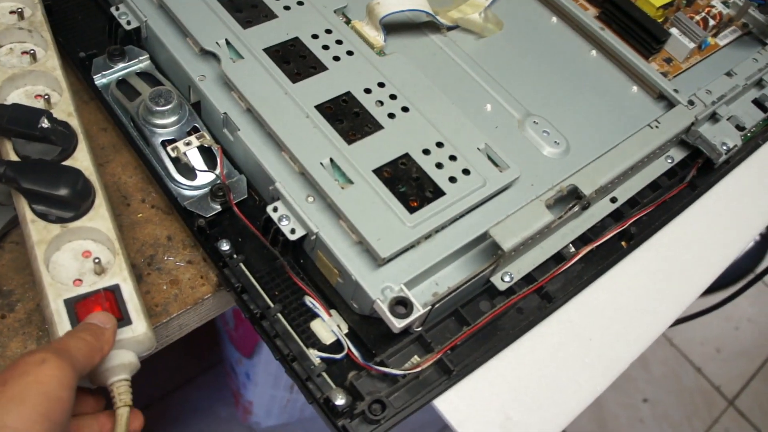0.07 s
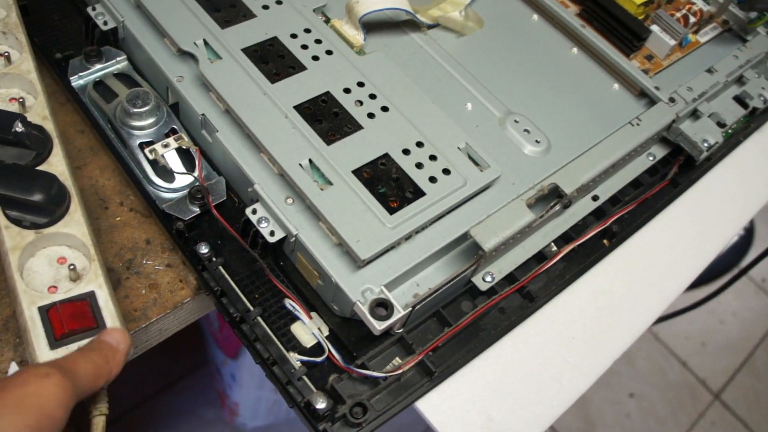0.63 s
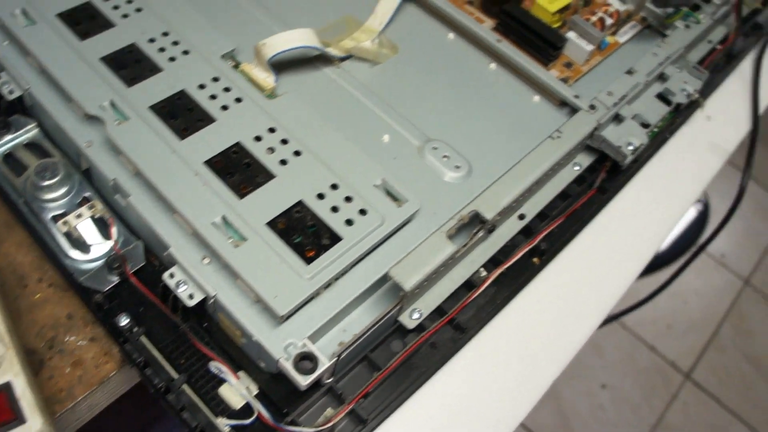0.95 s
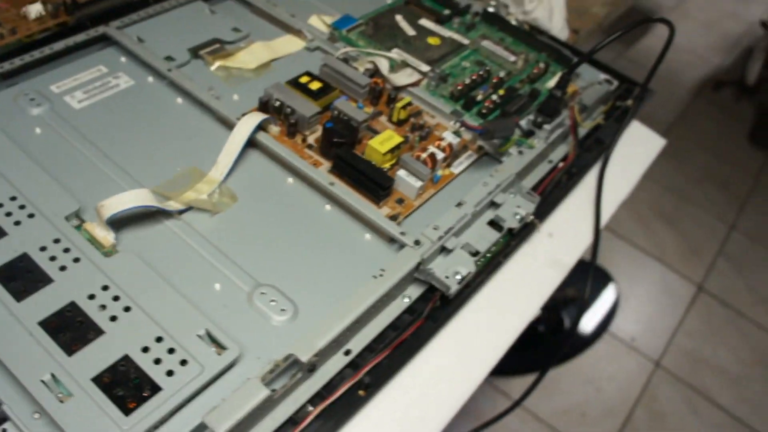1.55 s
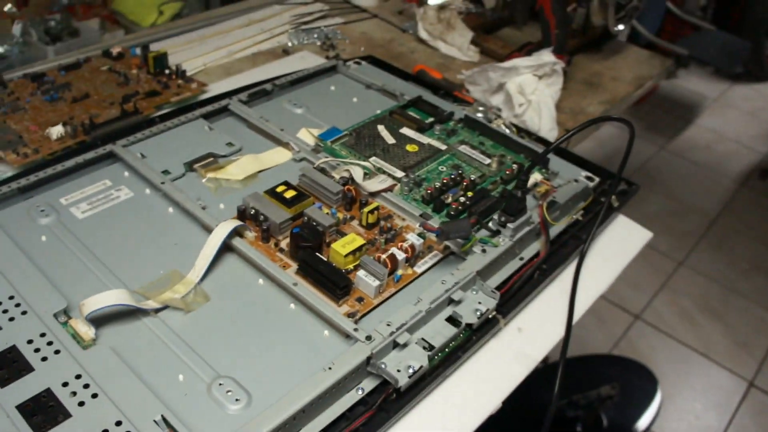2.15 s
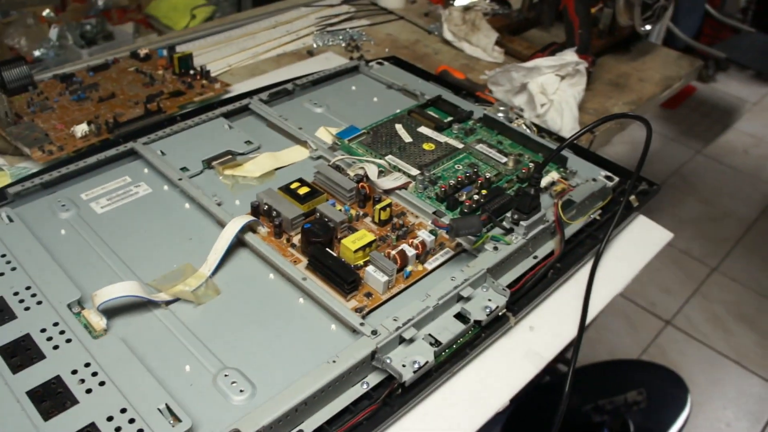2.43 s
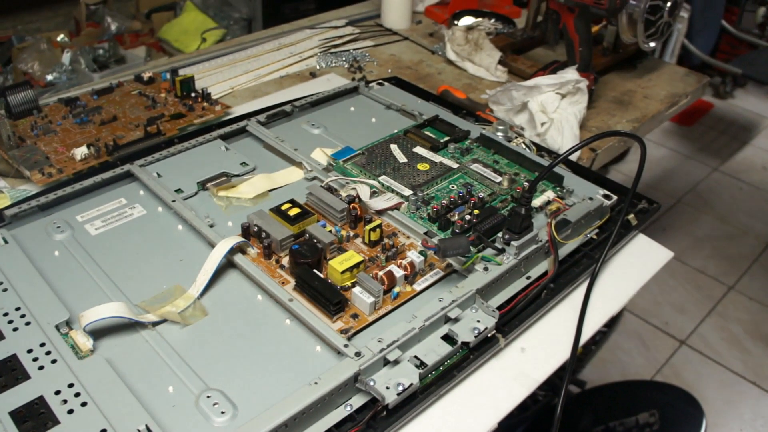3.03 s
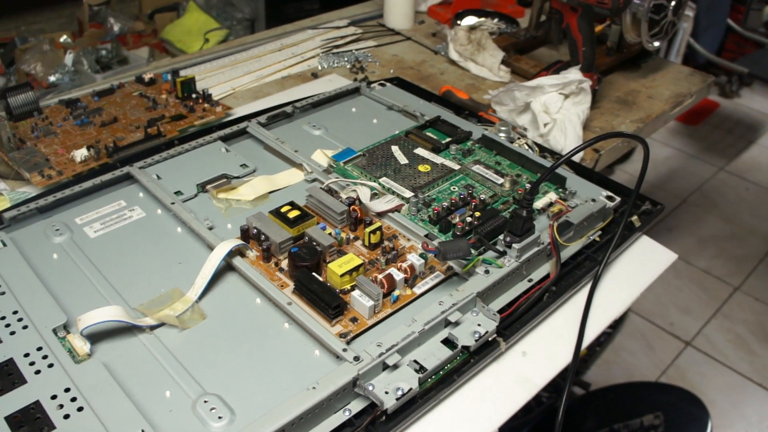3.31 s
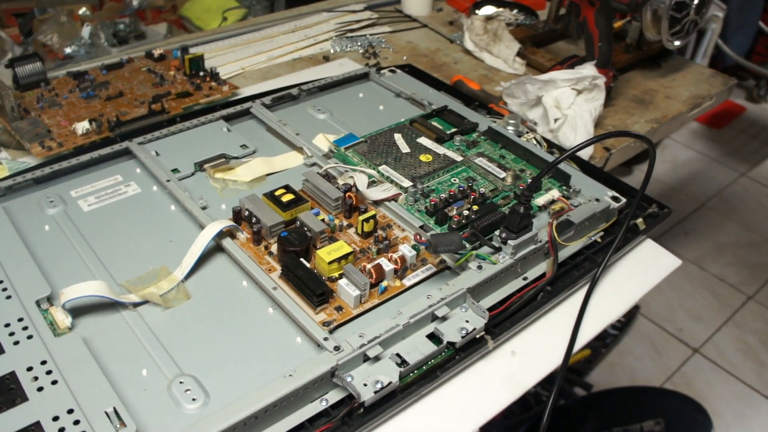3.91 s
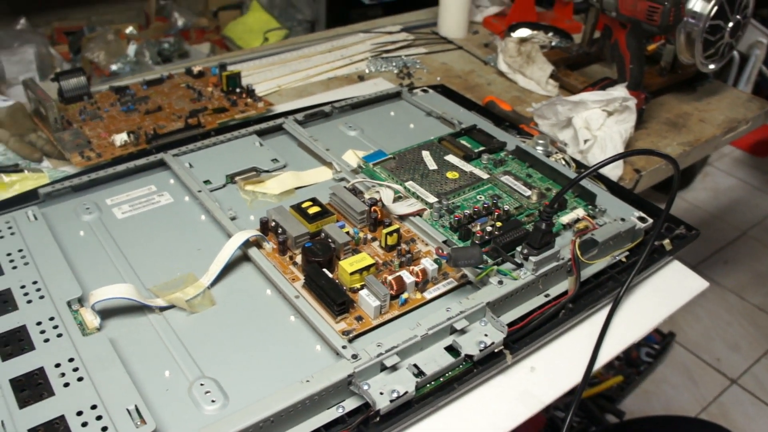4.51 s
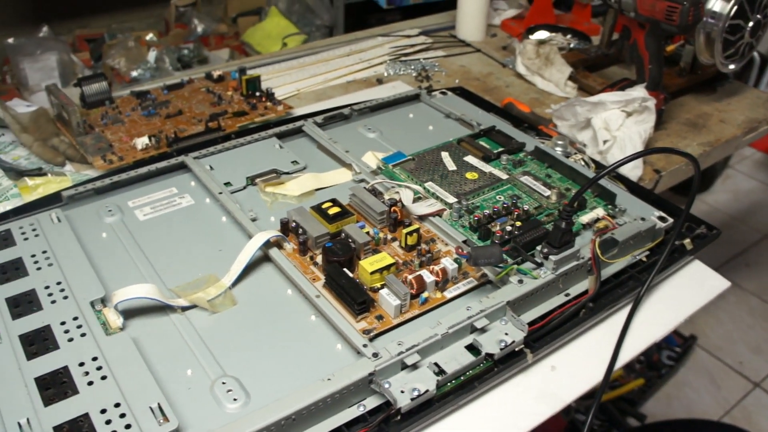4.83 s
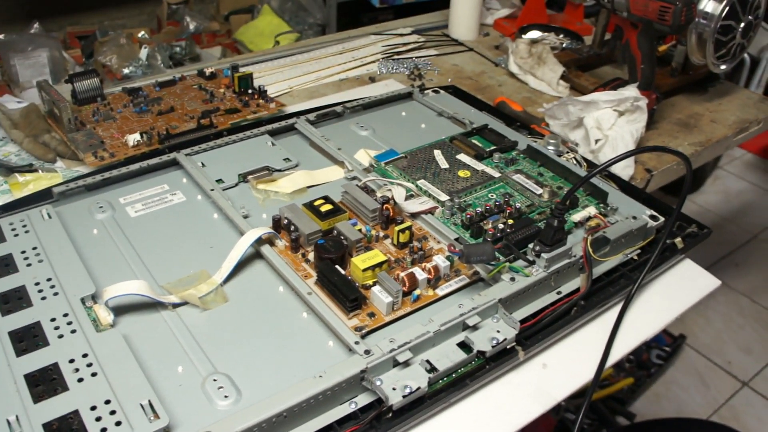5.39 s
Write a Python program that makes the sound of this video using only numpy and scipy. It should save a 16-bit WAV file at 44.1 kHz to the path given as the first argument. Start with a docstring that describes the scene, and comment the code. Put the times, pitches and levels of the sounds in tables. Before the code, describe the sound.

A power strip's rocker switch snaps sharply, then a sleeve swishes on the microphone, fingers rub plastic and one sharp click follows.

```python
"""A sharp snap comes first: a thumb trips the rocker switch of a power strip, whose housing rings on a
workbench in a quiet workshop. The hand then returns to the camera. A sleeve swishes and snags on it,
fingers rub its plastic shell by stick-slip friction, a seam creaks, and the shell ticks, then gives one
sharp click beside the microphones. Under it all lie room noise, a faint buzz and a pulsing whine."""
import sys
import numpy as np
from scipy import signal
from scipy.fft import rfft, irfft, next_fast_len
from scipy.io import wavfile
from scipy.ndimage import uniform_filter1d, map_coordinates

SR = 44100
rng = np.random.default_rng(int(sys.argv[2]) if len(sys.argv) > 2 else 0)


def bounce(signal):
    """Save signal as a 16-bit WAV file at the path given by the first command-line argument."""
    frames = np.transpose(np.atleast_2d(signal))
    limited = np.clip(frames, -1, 1)
    pcm = np.round(limited * 32767).astype(np.int16)
    wavfile.write(sys.argv[1], SR, pcm)


N = 249365
TIME = np.arange(N) / SR

# The rocker trips, hits its stop and bounces. Each row: start in seconds, level in dB,
# contact cut-off in Hz, relative scrape level in dB, scrape T60 (time to fall 60 dB) in seconds.
ROCKER_CONTACTS = [(0.4796, -19, 11000, 1.5, 0.043), (0.4818, -18.5, 11000, -2, 0.015),
                   (0.4845, -3.5, 6000, -16, 0.0065), (0.485, -18, 4000, -8, 0.0079),
                   (0.4868, -19, 4000, -6, 0.024), (0.4894, -8, 5000, -15, 0.015)]
STOP_S = ROCKER_CONTACTS[2][0]
# Modes of the strip's plastic housing. Each row: frequency in Hz, relative level in dB, T60 in seconds.
HOUSING_MODES = [(790, -35.5, 0.086), (962, -27, 0.085), (1540, -13.5, 0.018), (1760, -12, 0.034),
                 (2230, -12.5, 0.023), (2710, -10.5, 0.025), (2800, -11, 0.028), (3190, -4, 0.016),
                 (3510, -1.5, 0.019), (4000, -15, 0.011), (4450, -7, 0.026), (4870, -9.5, 0.024),
                 (6050, -22, 0.0052), (10790, -5, 0.011)]
# Spectrum reflected by bench and walls. Each row: frequency in Hz, gain in dB.
ECHO_SPECTRUM = [(60, -24), (400, -14.5), (1100, -16), (1650, -2.5), (2100, -8), (2850, -5), (3280, 1.5),
                 (3950, -15), (4800, -11), (5400, -15), (12000, -21.5)]
ECHO_DB, ECHO_BUILD_T60_S, ECHO_T60_S = -27.5, 0.023, 0.19
LATE_ECHO_DB, LATE_ECHO_T60_S = -31, 0.39  # level relative to the echo
THUMP_DB, THUMP_HZ, THUMP_T60_S = -25, 350, 0.059

# Sleeve strokes. Each row: time of greatest speed, rise and fall in seconds, rustle level in dB,
# hollow ring, panel ring and hiss in dB relative to the rustle, pan (left minus right) in dB.
SWISHES = [(1.153, 0.0084, 0.28, -38, -10, -4, -3.5, 1.5), (1.222, 0.029, 0.036, -33, -25, -1.5, -20, 0.5),
           (1.371, 0.086, 0.056, -31, -10, -18, -8.5, 3), (1.531, 0.029, 0.065, -38, -6, -14, -11, -5),
           (1.685, 0.065, 0.066, -44.5, -1.5, -3, -6.5, -2), (1.9, 0.11, 0.069, -48.5, 5, -15, -1.5, -2),
           (2.04, 0.037, 0.062, -42, 2, -20, 1, -4), (2.125, 0.012, 0.017, -41.5, -19, -21, -10, -5.5)]
# The resting cloth creeps. In order: rustle, hollow ring, panel ring, hiss and pan in dB, as above.
CREEP_LEVELS = (-53.5, -14, -10, -2.5, -2)
TOUCH_S, LIFT_S, RUB_DB = 1.14, 2.88, -62
# Spectrum of rustling cloth. Each row: frequency in Hz, gain in dB.
CLOTH_SPECTRUM = [(59, -58), (100, -32), (260, -16.5), (400, -7.5), (684, 1.5), (1000, -4.5), (2100, -3),
                  (3070, -6), (6000, -5.5), (8100, -6), (11700, -5), (13400, -52), (15000, -94)]
# Folds let go. Each row: start in seconds, level in dB, pan in dB, ring gain in dB, part that rings.
SNAGS = [(1.154, -24, -6, 12, "panel"), (1.2037, -25, 2, 9, "panel"), (1.2096, -18.5, -2, 10, "panel"),
         (1.214, -18, 11, 12, "panel"), (1.2185, -20, 3, 6, "panel"), (1.2293, -17, -4, 3, "panel"),
         (1.2332, -12.5, 0.5, 6, "panel"), (1.2369, -19.5, 2, 15, "panel"), (1.2776, -23, 8, 22, "panel"),
         (1.2935, -28, 3, 7, "hollow"), (1.4975, -28.5, -22, 11, "hollow"),
         (1.687, -18.5, -8, 20, "hollow"), (2.128, -27, -11, 3, "hollow"),
         (2.376, -27, -1.5, 17.5, "hollow"), (3.556, -39, 0, 19, "hollow")]
NUDGE_DB = -29  # relative to the snag's peak
# Resonances of the camera's hollows and of the thin panel beside each microphone port.
# Each row: frequency in Hz, bandwidth in Hz, gain in dB.
HOLLOW_MODES = [(504, 73, -2), (1760, 460, -1), (2510, 1000, -10.5)]
LEFT_PANEL_MODES = [(1475, 280, 0.5), (2400, 410, 0.5)]
RIGHT_PANEL_MODES = [(1550, 190, 1.5), (3100, 1600, -2.5), (4160, 340, -0.5)]
PRESSURE_DETUNE = 0.025  # fraction of the pitch

# Finger strokes. Each row: time of greatest speed, rise and fall in seconds, level and pan in dB, grip.
FINGER_STROKES = [(1.875, 0.019, 0.038, -39, -11, "thin"), (2.415, 0.0084, 0.019, -49.5, -7, "soft"),
                  (2.475, 0.028, 0.03, -47, -8, "soft"), (2.53, 0.027, 0.02, -42.5, -8, "soft"),
                  (2.595, 0.033, 0.03, -44.5, -10, "soft"), (2.655, 0.029, 0.081, -42.5, -12, "soft"),
                  (2.735, 0.051, 0.038, -38, -11, "bright"), (2.828, 0.052, 0.039, -36.5, -11, "bright"),
                  (2.27, 0.032, 0.027, -50.5, -2, "light"), (3.68, 0.13, 0.29, -60, 0, "light"),
                  (3.935, 0.022, 0.029, -53, -6, "light"), (3.99, 0.02, 0.1, -56, -3, "light"),
                  (4.195, 0.023, 0.025, -45, -4, "firm"), (4.229, 0.021, 0.02, -39, -1, "firm"),
                  (4.378, 0.022, 0.0073, -40, -14, "squeaky")]
# Shell resonances excited by each grip. Each row: frequency in Hz, bandwidth in Hz, gain in dB.
GRIP_MODES = {"thin": [(4400, 1200, 0)], "soft": [(4080, 1300, -6.5), (5800, 390, -7), (8500, 600, -17)],
              "bright": [(4100, 650, 5.5), (4600, 760, 7), (5950, 200, -22), (2870, 450, -3.5)],
              "light": [(3420, 700, 2), (4480, 570, -1), (5870, 340, 3)], "firm": [(3370, 550, 6),
              (4600, 1100, 8), (5800, 780, 9.5), (9400, 5600, -7.5), (1430, 2200, -3.5)],
              "squeaky": [(4060, 800, 4), (11000, 840, 0), (2470, 810, -7), (7140, 2400, -14.5)]}
# The shell clicks under the grip. Each row: start in seconds, level in dB, pitch and bandwidth of the
# pressed spot in Hz, its ring gain in dB, pan in dB, lag at the left port in milliseconds.
SHELL_CLICKS = [(2.4867, -20, 3700, 1300, 26, -14, 0.0), (2.8055, -28, 4600, 700, 16, -9, .1),
                (2.8235, -27, 4500, 700, 16, -9, .1), (4.2465, -28, 9000, 1200, 6, 0, .05),
                (4.2555, -33, 5000, 700, 0, 0, .05), (4.6298, -20.5, 5200, 2200, 12, 0, .09),
                (4.6435, -33, 4500, 700, 8, -2, .09), (4.793, -42, 11000, 700, 8, 0, .05),
                (5.464, 0, 5850, 600, -3, -2, .3)]
# Steep treble cut-off of each click: its value at 0 dB, set lower for quieter clicks.
CLICK_CUTOFF_HZ, CLICK_CUTOFF_HZ_PER_DB = 14900, 186
# Response of the camera shell. Each row: frequency in Hz, gain in dB.
SHELL_SPECTRUM = [(120, -91), (200, -74), (980, -16.5), (1700, -31), (2310, -12), (2890, -24), (3500, -13),
                  (4200, -14.5), (5750, 1), (7400, -11), (8500, -4.5), (10000, -11.5), (11300, -3),
                  (13000, -17), (15500, -25), (17000, -42)]
# Resonances of the creaking seam. Each row: frequency in Hz, bandwidth in Hz, gain in dB.
SEAM_MODES = [(990, 490, -1.5), (2030, 300, 4)]

# Spectrum of the room noise. Each row: frequency in Hz, gain in dB.
ROOM_SPECTRUM = [(18, -69), (30, -26), (71, -20.5), (108, -12.5), (154, -7), (198, -3), (442, -0.5),
                 (527, -1.5), (1550, -6.5), (2050, -8.5), (11300, -17), (12300, -16), (13400, -73),
                 (16000, -84)]
# Stereo width of room and sleeve. Each row: frequency in Hz, side minus mid in dB.
ROOM_SIDE = [(60, 4), (200, 4.5), (700, 4), (2400, 3), (8000, 0), (13000, -0.5)]
SLEEVE_SIDE = [(150, 3), (400, -13), (700, -7.5), (1400, 4.5), (3000, 5), (12000, -0.5)]
# Partials of the electrical buzz. Each row: frequency in Hz, base level in dB.
BUZZ_PARTIALS = [(800, -74), (1000, -72), (1400, -78), (1600, -75)]
# The buzz grows as the camera turns to circuit boards. Each row: time in seconds, gain in dB.
BUZZ_GROWTH = [(1.2, -1.5), (2.8, 0.5)]
WHINE_HZ, WHINE_WIDTH_HZ, WHINE_DB = 4790, 340, -65
WHINE_FIRST_S, WHINE_PERIOD_S = 0.125, 0.2525
ROOM_DB, TOP_HZ = -52, 16500


def switch(size=16384):
    """Impact excitation: each contact rings the housing's modes and scrapes; bench and room answer."""
    out = np.zeros((2, N))
    housing = ring(HOUSING_MODES, size)
    housing = np.array([housing, delay(housing, ms=0.12)]) / np.abs(housing).max()
    for s, db, contact_hz, scrape_db, scrape_t60 in ROCKER_CONTACTS:
        scrape = cut(rng.standard_normal((2, size)), 1900, "high") * fade(scrape_t60, size)
        add(out, s, amp(db) * cut(housing + amp(scrape_db) * scrape, contact_hz, "low", order=1))
    add(out, STOP_S, reflections(size))
    add(out, STOP_S, bench_thump(size))
    return cut(cut(out, 86, "high"), 12400, "low", order=12) * pan(1.5)


def reflections(size):
    """Diffuse reverberation: echoes build in milliseconds, die among the clutter and leave a faint tail."""
    scatter = unit(ports(colour(rng.standard_normal((2, size)), ECHO_SPECTRUM), ROOM_SIDE))
    early = fade(ECHO_T60_S, size) - fade(ECHO_BUILD_T60_S, size)
    late = amp(LATE_ECHO_DB) * fade(LATE_ECHO_T60_S, size)
    return amp(ECHO_DB) * scatter * (early + late)


def bench_thump(size):
    """Damped vibration: the push on the switch draws a short, low thump from the bench top."""
    thump = cut(rng.standard_normal(size), THUMP_HZ, "low", order=1) * fade(THUMP_T60_S, size)
    return amp(THUMP_DB) * thump * pan(0)


def sleeve():
    """Friction noise: the cloth's speed drives rustle, fibre hiss and the ring of hollows and panels."""
    touching = uniform_filter1d(1. * ((TIME > TOUCH_S) & (TIME < LIFT_S)), size=200)
    moves = [(touching, CREEP_LEVELS)]
    moves += [(glide(s, rise_s, fall_s), levels) for s, rise_s, fall_s, *levels in SWISHES]
    cloth_slips = ports(friction(rate=13000, spread_db=-0.5, flutter_db=1.76), SLEEVE_SIDE)
    hollow_slips = ports(friction(rate=5000, spread_db=1.5, flutter_db=1.0), SLEEVE_SIDE)
    panel_slips = ports(friction(rate=2600, spread_db=0.5, flutter_db=2.5), SLEEVE_SIDE)
    cloth = colour(cloth_slips, CLOTH_SPECTRUM)
    rustle = cut(cloth, 5560, "low", order=4)
    hiss = cut(cloth, 5970, "high", order=4)
    layers = (rustle, sing(hollow_slips, HOLLOW_MODES), waver(panels(panel_slips)), hiss)
    # incoherent sounds add in power, layer by layer
    powers = np.zeros((len(layers), 2, N))
    for speed, (db, hollow_db, panel_db, hiss_db, pan_db) in moves:
        for power, relative_db in zip(powers, (0, hollow_db, panel_db, hiss_db)):
            power += (speed * amp(db + relative_db) * pan(pan_db)) ** 2
    swishes = sum(unit(layer) * np.sqrt(power) for layer, power in zip(layers, powers))
    return swishes + grip_rub() * touching


def grip_rub():
    """Stick-slip friction: the moving grip drives one broad, low resonance, heard as a dull rub."""
    slips = friction(rate=1500, spread_db=6.5, flutter_db=0)
    return unit(sing(slips, [(382, 380, 0)])) * amp(RUB_DB)


def panels(pair):
    """Plate resonance: each port hears the thin panel next to it."""
    return np.array([sing(pair[0], LEFT_PANEL_MODES), sing(pair[1], RIGHT_PANEL_MODES)])


def waver(pair):
    """Frequency modulation: changing pressure pulls the resonances slightly up and down."""
    position = np.cumsum(1 + PRESSURE_DETUNE * walk(22))
    return np.array([map_coordinates(x, [position], mode="mirror") for x in pair])


def snags(size=2048):
    """Sudden release: a caught fold lets go, rings a panel or the hollows and nudges the camera."""
    out = np.zeros((2, N))
    for s, db, pan_db, ring_db, part in SNAGS:
        envelope = fade(0.0037, size) + amp(-10) * fade(0.038, size)
        burst = colour(ports(rng.standard_normal((2, size)) * envelope, SLEEVE_SIDE), CLOTH_SPECTRUM)
        ringing = panels(burst) if part == "panel" else sing(burst, HOLLOW_MODES)
        snag = unit_peak(burst + amp(ring_db) * ringing)
        nudge = cut(rng.standard_normal(size), 240, "low", order=1) * fade(0.065, size)
        add(out, s, amp(db) * pan(pan_db) * (snag + amp(NUDGE_DB) * nudge))
    return out


def shell_clicks(size=2048):
    """Impulse response: the shell snaps beside the ports, rings briefly and rattles as it settles."""
    out = np.zeros((2, N))
    shell = colour(signal.unit_impulse(size), SHELL_SPECTRUM)
    for s, db, hz, width_hz, ring_db, pan_db, lag_ms in SHELL_CLICKS:
        snap = shell + amp(ring_db) * sing(shell, [(hz, width_hz, 0)])
        snap = unit_peak(cut(snap, CLICK_CUTOFF_HZ + CLICK_CUTOFF_HZ_PER_DB * db, "low", order=8))
        chatter = rng.standard_normal((2, size)) * (fade(0.016, size) - fade(0.0022, size))
        rattle = unit_peak(signal.fftconvolve(chatter, snap[None], axes=1)[:, :size])
        click = np.array([delay(snap, lag_ms), snap]) + amp(-15) * rattle
        add(out, s, amp(db) * pan(pan_db) * click)
    return out


def fingers():
    """Stick-slip friction: skin excites the shell's resonances, louder the faster it slides."""
    out = np.zeros((2, N))
    for name, modes in GRIP_MODES.items():
        rub = unit(sing(friction(rate=9800, spread_db=0, flutter_db=1.0), modes))
        power = sum((glide(s, rise_s, fall_s) * amp(db) * pan(pan_db)) ** 2
                    for s, rise_s, fall_s, db, pan_db, grip in FINGER_STROKES if grip == name)
        out += rub * np.sqrt(power)
    return cut(out, 11900, "low", order=12)


def seam_creak(db=-55):
    """Stick-slip under load: the tightening grip makes a seam ring in sparse, uneven slips."""
    slips = friction(rate=590, spread_db=2, flutter_db=6)
    return unit(sing(slips, SEAM_MODES)) * glide(s=2, rise_s=0.33, fall_s=0.3) * amp(db)


def room_noise():
    """Stationary noise: an even wash, strongest in the low middle range, fills the workshop."""
    air = colour(rng.standard_normal((2, N)), ROOM_SPECTRUM)
    return unit(ports(air, ROOM_SIDE)) * amp(ROOM_DB)


def buzz():
    """Superposition: four partials, each drifting in level, form a faint electrical buzz."""
    partials = np.zeros(N)
    for hz, db in BUZZ_PARTIALS:
        amplitude = np.sqrt(2) * amp(db + 2 * walk(4.47))
        partials += amplitude * np.sin(2 * np.pi * (hz * TIME + rng.random()))
    return partials * amp(np.interp(TIME, *np.transpose(BUZZ_GROWTH)))


def whine():
    """Amplitude modulation: a narrow band of noise pulses about four times a second."""
    pulse = np.cos(2 * np.pi * (TIME - WHINE_FIRST_S) / WHINE_PERIOD_S)
    band = unit(sing(rng.standard_normal((2, N)), [(WHINE_HZ, WHINE_WIDTH_HZ, 0)]))
    return amp(WHINE_DB) * band * np.clip(0.59 + 0.49 * pulse, 0, 1)


def friction(rate, spread_db, flutter_db):
    """Shot noise: tiny uneven slips, `rate` a second on average, under a fluttering contact pressure."""
    slipping = rng.random(N) < rate / SR
    strength = amp(spread_db * np.minimum(rng.exponential(size=N), 4))
    return unit(slipping * strength * rng.standard_normal((2, N)) * amp(flutter_db * walk(90)))


def glide(s, rise_s, fall_s):
    """Gaussian envelope: the speed of a sliding touch rises to 1 at time s and falls again."""
    return np.exp(-((TIME - s) / np.where(TIME < s, rise_s, fall_s)) ** 2)


def walk(rate):
    """Random drift: straight lines join `rate` normally distributed values a second."""
    return np.interp(TIME * rate, np.arange(N), rng.standard_normal(N))


def ring(modes, size):
    """Modal superposition: damped sines add, neighbouring modes starting in opposite directions."""
    return sum((-1) ** k * amp(db) * fade(t60, size) * np.sin(2 * np.pi * hz * TIME[:size])
               for k, (hz, db, t60) in enumerate(modes))


def fade(t60, size):
    """Exponential decay: 60 dB are lost in t60 seconds."""
    return np.exp(-np.log(1000) * TIME[:size] / t60)


def sing(x, modes):
    """Forced vibration: x drives parallel resonances, each applied twice for steep skirts."""
    return sum(amp(db) * resonate(resonate(x, hz, width), hz, width) for hz, width, db in modes)


def resonate(x, hz, width_hz):
    """Second-order resonance with gain 1 at its centre."""
    return signal.lfilter(*signal.iirpeak(hz, hz / width_hz, fs=SR), x)


def cut(x, hz, kind, order=2):
    """Maximally flat low-pass or high-pass filter."""
    return signal.sosfilt(signal.butter(order, min(hz, SR / 2 - 1), kind, fs=SR, output="sos"), x)


def colour(x, points):
    """Minimum-phase filter through (Hz, dB) points."""
    hz, db = np.transpose(points)
    n = 2 * next_fast_len(x.shape[-1])
    bins = np.maximum(np.arange(n // 2 + 1) * SR / n, 1)
    gain = amp(np.interp(np.log(bins), np.log(hz), db))
    cepstrum = irfft(np.log(gain))
    # folding the cepstrum onto positive time makes the filter causal
    cepstrum[1:n // 2] *= 2
    cepstrum[n // 2 + 1:] = 0
    return irfft(rfft(x, n) * np.exp(rfft(cepstrum)))[..., :x.shape[-1]]


def delay(x, ms):
    """Linear phase shift: a delay finer than one sample."""
    n = 2 * len(x)
    bins = np.arange(n // 2 + 1) * SR / n
    return irfft(rfft(x, n) * np.exp(-2j * np.pi * bins * ms / 1000))[:len(x)]


def ports(pair, side_points):
    """Mid-side stereo: two unrelated signals add at the left port and subtract at the right."""
    side = colour(pair[1], side_points)
    return np.array([pair[0] + side, pair[0] - side])


def pan(db):
    """Constant-power panning: left exceeds right by db."""
    gains = amp(np.array([db, -db]).reshape(2, -1) / 2)
    return gains / np.sqrt(np.mean(gains ** 2, axis=0))


def add(out, s, sound):
    """Superposition: a stereo sound joins the mix at time s."""
    start = int(s * SR)
    out[:, start:start + sound.shape[1]] += sound[:, :N - start]


def amp(db):
    """Amplitude ratio of a level in decibels."""
    return 10 ** (np.asarray(db) / 20)


def unit(x):
    """Normalisation to rms 1."""
    return x / np.sqrt(np.mean(x ** 2))


def unit_peak(x):
    """Normalisation to peak 1."""
    return x / np.abs(x).max()


def scene():
    """Linear superposition: the pressures of switch, handling and background add."""
    foreground = switch() + sleeve() + snags() + seam_creak() + fingers() + shell_clicks()
    return foreground + room_noise() + buzz() + whine()


def record(dry):
    """Band limiting: the camera cuts the highest treble steeply."""
    return signal.sosfilt(signal.ellip(8, .2, 70, TOP_HZ, fs=SR, output="sos"), dry)


dry = scene()
out = record(dry)
bounce(out)
```